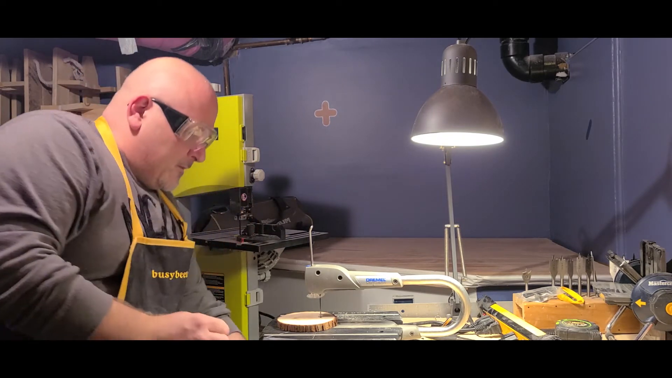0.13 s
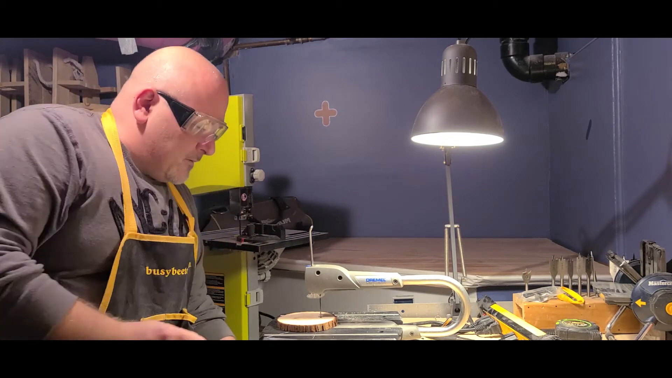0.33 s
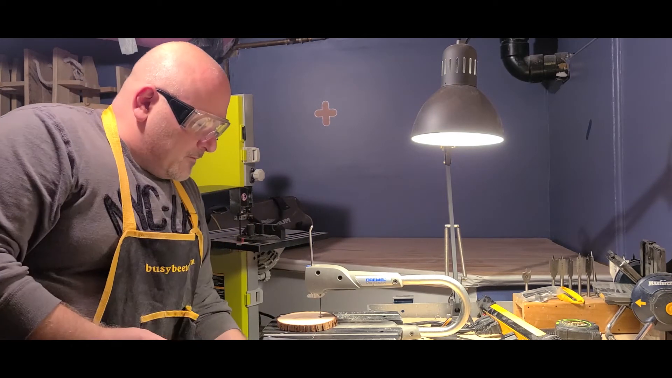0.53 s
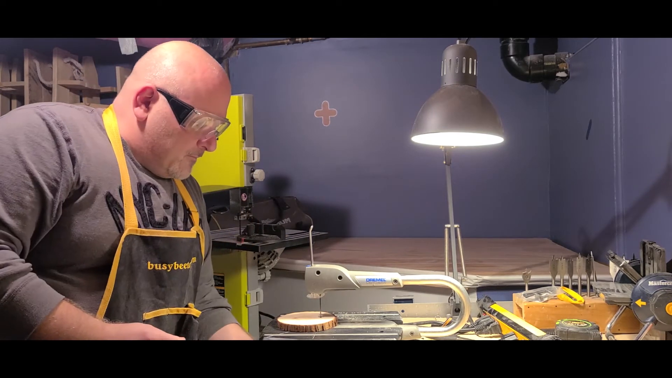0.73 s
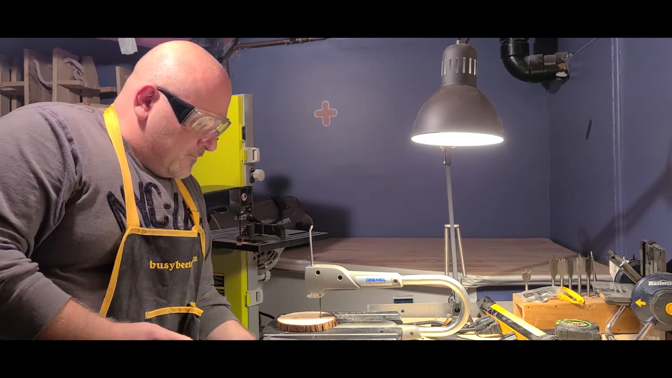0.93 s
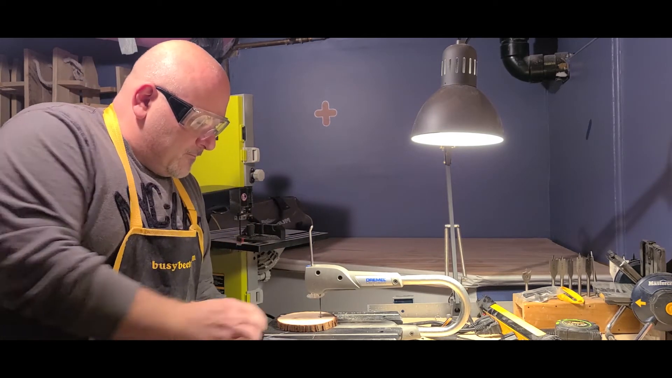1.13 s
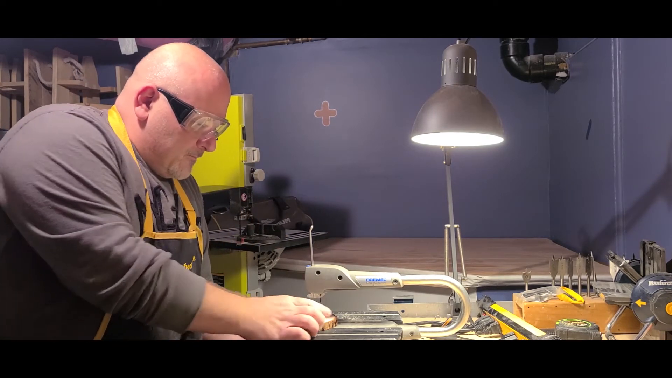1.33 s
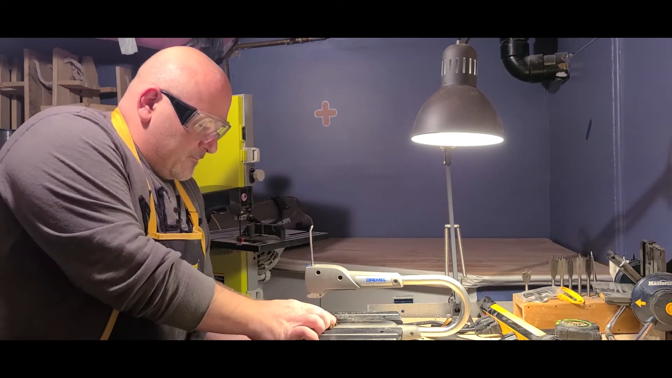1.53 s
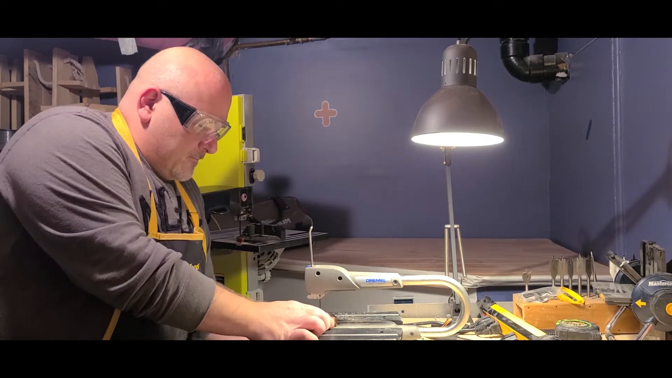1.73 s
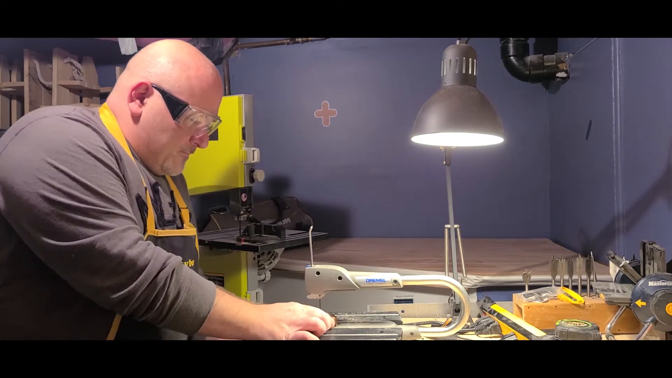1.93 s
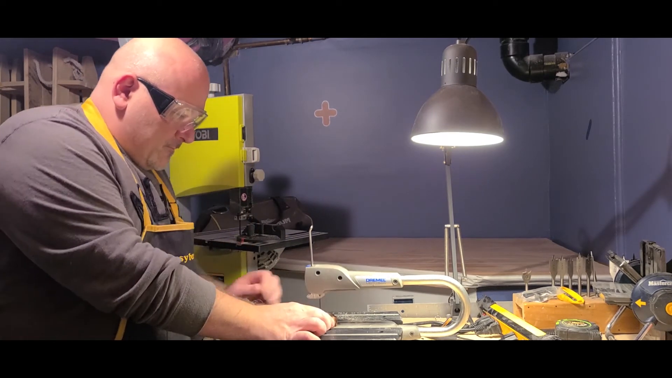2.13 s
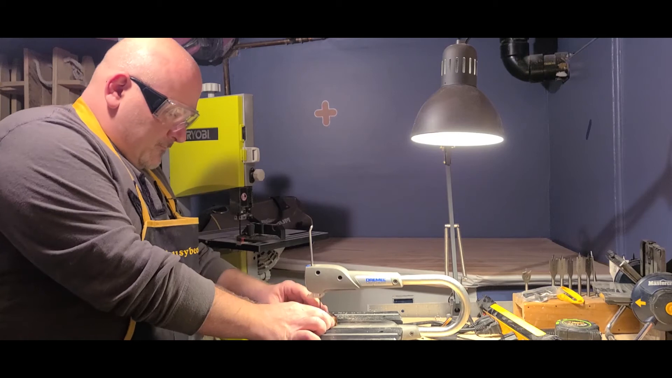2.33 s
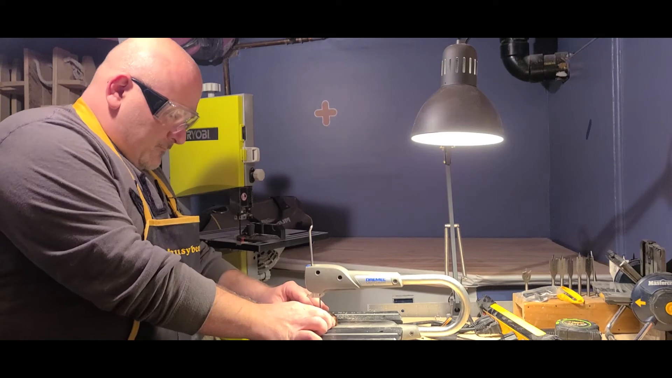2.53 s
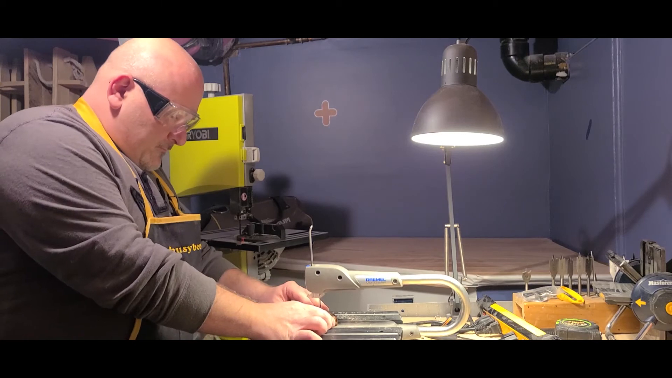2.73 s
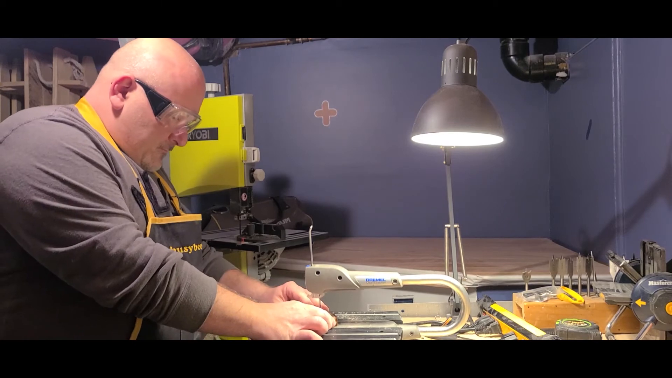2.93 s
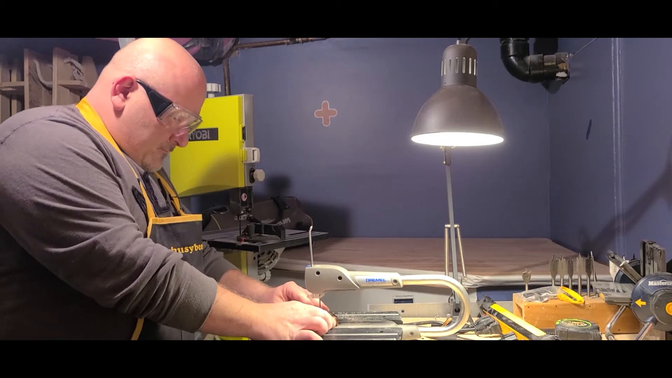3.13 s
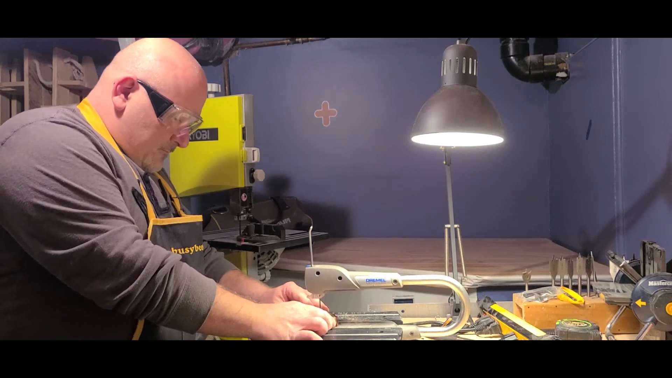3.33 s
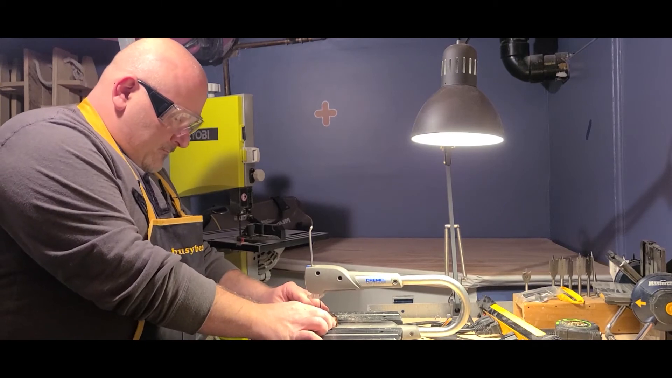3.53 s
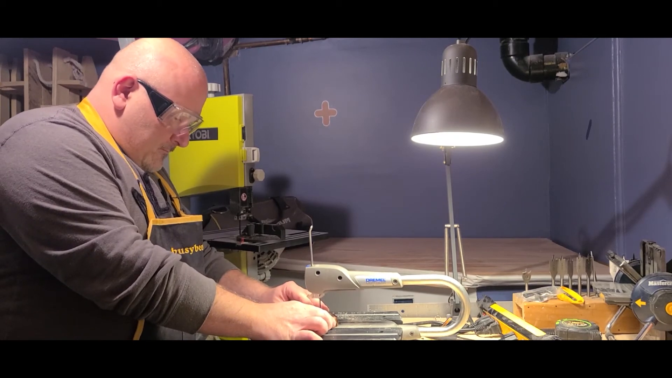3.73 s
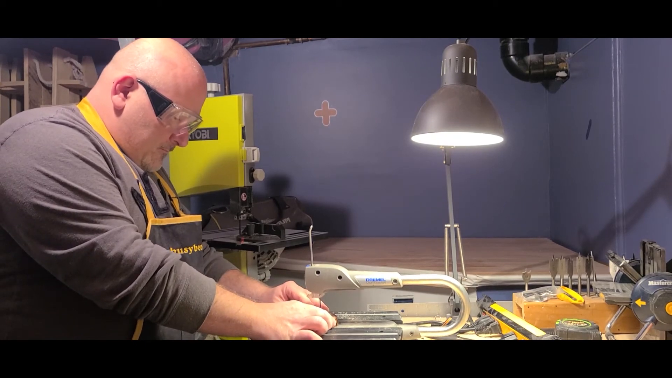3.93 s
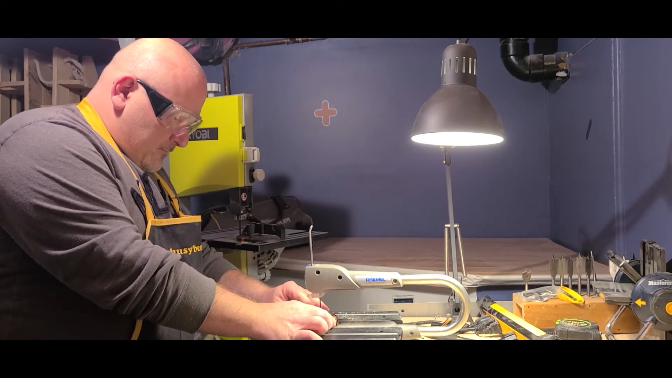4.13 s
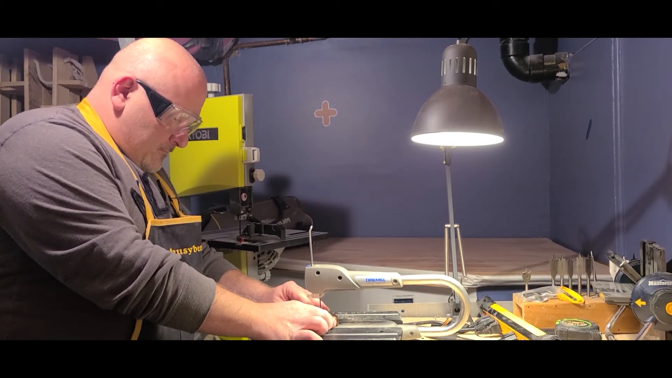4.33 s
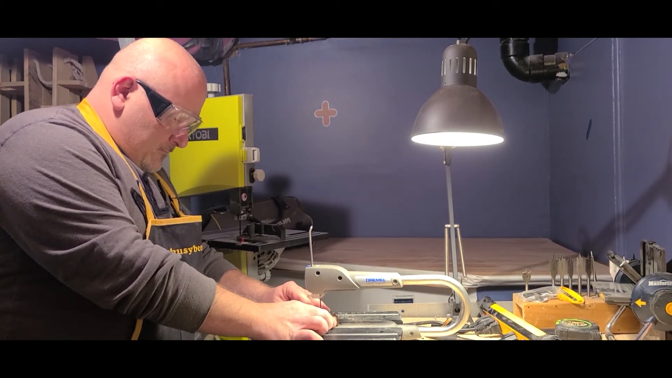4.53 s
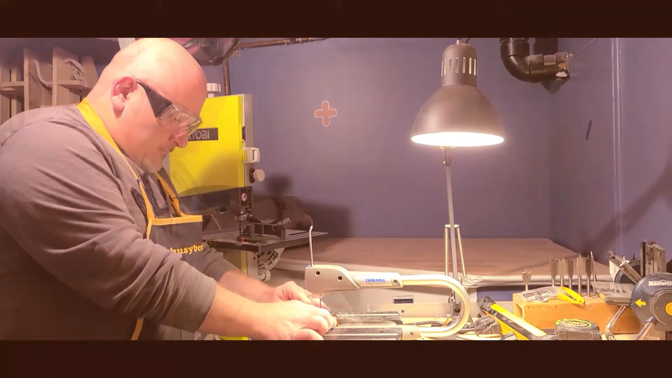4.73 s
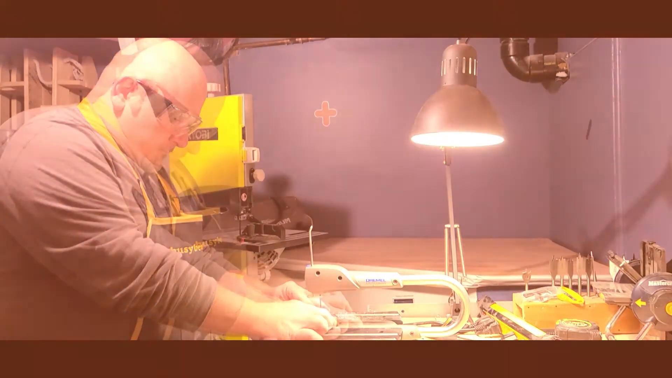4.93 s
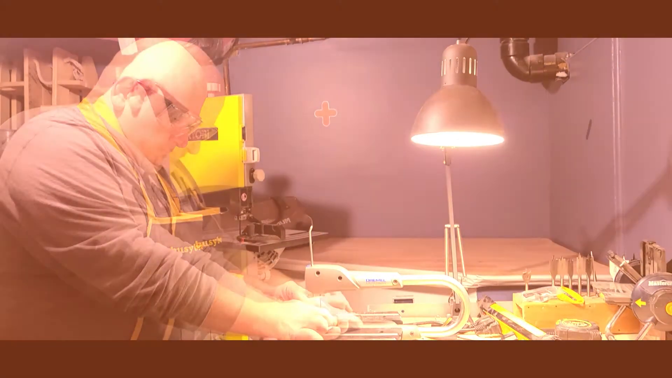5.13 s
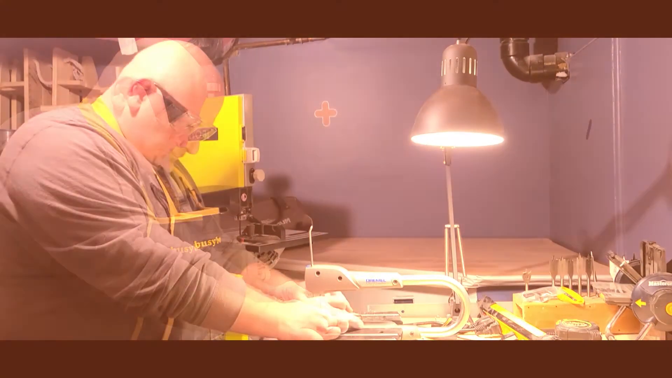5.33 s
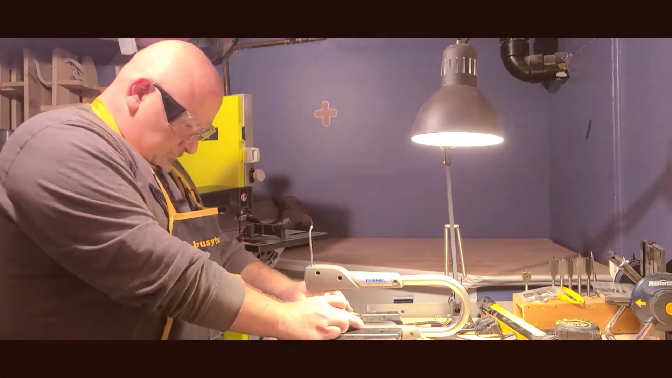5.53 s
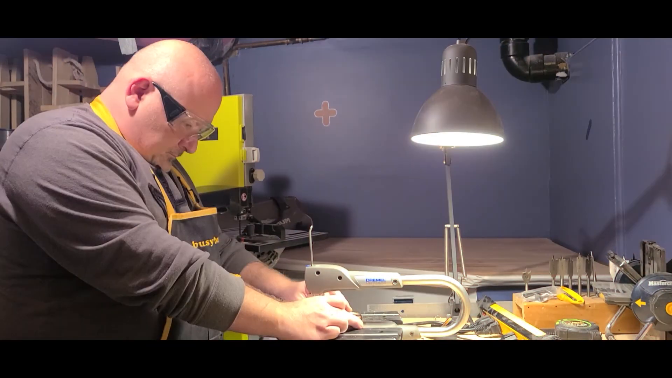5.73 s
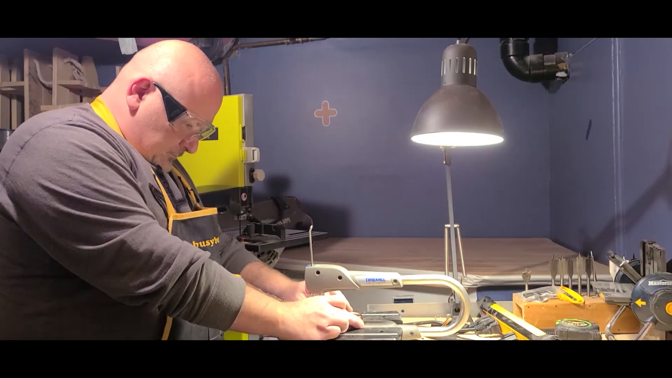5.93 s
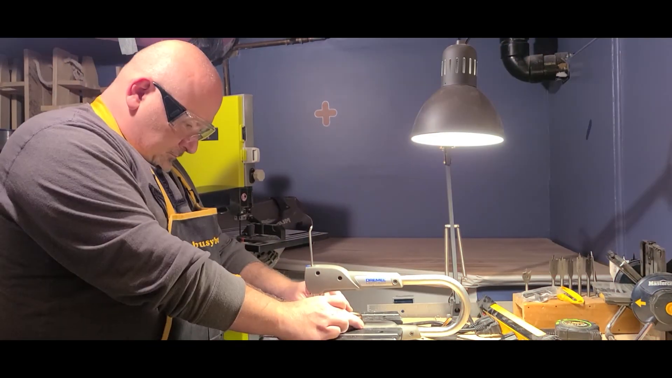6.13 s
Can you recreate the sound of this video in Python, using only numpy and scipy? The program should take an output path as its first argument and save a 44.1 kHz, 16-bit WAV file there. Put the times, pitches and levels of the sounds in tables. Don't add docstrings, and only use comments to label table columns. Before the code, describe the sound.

In a quiet workshop, low foot thuds, a shoe scuff, clothing rustle and tiny bench ticks come first. A bright plastic switch snaps and a scroll saw spins up almost instantly into a rattling hum with a high whine. Wood is pressed on, adding growing rasp and table knocks. After a tiny gap the saw continues steadier, with brief bursts of cutting. Close stereo microphone with automatic volume.

```python
import sys
import numpy as np
from scipy import signal
from scipy.fft import rfft, irfft, next_fast_len
from scipy.io import wavfile
from scipy.ndimage import map_coordinates

SR = 44100
rng = np.random.default_rng(int(sys.argv[2]) if len(sys.argv) > 2 else 0)


def unload_wav(signal):
    wavfile.write(
        sys.argv[1],
        SR,
        np.round(np.clip(np.atleast_2d(signal).T, -1, 1) * 32767).astype(np.int16),
    )


def boost(x):
    u = np.asarray(x, float) / 20
    return 10 ** u


N = 273420
TIME = np.arange(N) / SR

# pitch_hz, level_db
ROOM_COLOUR = [(15, -40), (55, 2), (250, -7), (1500, -20.5), (3500, -25), (5300, -28), (6500, -18),
               (8600, -41), (15500, -32)]
# pitch_hz, level_db
THUD_COLOUR = [(15, -29), (25, -13), (75, 6), (113, -21), (162, -2.5), (208, -40), (300, -30), (390, -49),
               (660, -120)]
# pitch_hz, level_db
SCUFF_COLOUR = [(410, -33), (700, 5), (893, -7), (1280, 2.5), (2370, -9), (4670, -17), (5040, -22),
                (7040, -23), (15000, -45)]
# pitch_hz, level_db
RUSTLE_COLOUR = [(120, -40), (200, -16), (248, 4.5), (280, -7), (406, -4.5), (500, -6), (1000, -20),
                 (1300, -55), (2200, -120)]
# peak_s, thud_db, scuff_db, rustle_db
MOVES = [(0.077, -43, -62, -50), (0.126, -36, -63, -51.5), (.2, -42.5, -59, -61), (.25, -48, -60.5, -58),
         (.298, -44, -70, -65), (.34, -55, -78, -72), (.44, -62, -85, -80), (.51, -57, -81, -71),
         (.558, -47, -84, -71), (.64, -56, -77, -59), (.71, -56, -85, -63), (.82, -59, -85, -61),
         (.854, -59, -77, -65), (1.016, -64, -95, -73), (1.306, -55, -92, -85), (1.42, -70, -90, -84),
         (1.54, -54, -72, -75)]
MOVE_RISE_DB_PER_S = 1100
MOVE_FALL_DB_PER_S = [
    250,
    172,
    112,
]
# start_s, level_db, pitch_hz, fade_60db_s
TAPS = [
    (0.0695, -53, 2940, 0.2),
    (.0745, -61, 2100, .05),
    (.194, -61, 4700, .03),
    (.632, -70, 2600, .04),
    (.847, -69, 2600, .04),
]

SWITCH_S = 1.5485
# silence_start_s, silence_end_s
CHANGE_S = (5.086, 5.108)
TEETH = 50
FREE_SPEED = 29.41
START_LACK, SPIN_UP_S = 24.4, 0.032
# time_s, load_strokes_per_s (speed lost), push_db
FEED = [(1.55, 0.039, -43.5), (3.0, 0.0099, -38.5), (3.5, 0.042, -36.5), (3.8, 0.11, -32),
        (4.2, .22, -29.5), (4.45, 0.37, -25.5), (4.6, 0.39, -25), (4.75, 0.41, -27.5), (5.085, 0.46, -28),
        (5.11, 0.0011, -39), (5.3, 0.063, -37), (5.42, 0.18, -28), (5.53, 0.195, -30.5),
        (5.65, 0.0096, -36.5), (5.77, 0.00098, -37.5), (5.87, .19, -30.5), (6.05, 0.3, -25.5),
        (6.2, 0.00098, -40.5)]

# stroke_multiple, level_db
HUM_EARLY = [(1, -18), (2, -11.5), (3, 4), (4, -3), (5, -5.5), (6, -16), (7, -26), (8, -28), (9, -30)]
# stroke_multiple, level_db
HUM_LATE = [(1, -27), (2, -29), (3, 2.5), (4, -7.5), (5, -8), (6, -4), (7, -16), (8, -8), (9, -21)]
WHINE_SIDES_DB = [-18, -16, -19, -11, -15, -7, -4, 0, -10, -11, -14, -18, -21]
OCTAVE_SIDES_DB = [-19, -14, -11, -10, -6, 0, -2, -5, -8, -10, -14, -18, -19]
PEAK_TURN, SMEAR = [0.277, 0.586], [0.019, 0.038]
# centre_stroke_multiple, level_db, spread_multiples
UPPER_CLUSTERS = [(100.2, -30, 6.5), (152.6, -32, 4.2), (200.8, -35, 3.6), (250, -42, 8), (301, -47, 3.7),
                  (349, -48.5, 3.8), (400.8, -45.5, 3), (485, -64, 4), (500, -51, 5.4)]
# time_s, width_s, rise_db
FLARES = [
    (1.72, 0.081, 8.5),
    (5.5, 0.11, 2),
]
# pitch_hz, level_db
CASING_COLOUR = [(120, -64), (250, -21.5), (500, -17.5), (820, -7), (1050, -18.5), (1300, -8),
                 (2200, -15.5), (3300, -11), (5200, -15), (8200, -23), (10000, -25), (13000, -27),
                 (15500, -39)]
# pitch_hz, width_hz, level_db
CASING_RINGS = [(740, 40, -8), (833, 16, 4.5), (1310, 11, 9.5), (1750, 60, -19)]

# pitch_hz, width_hz, level_db
TABLE_RINGS = [(218, 22, -9.5), (264, 26, -14), (391.5, 42, -6), (450.6, 22, -5), (574, 54, -7),
               (681, 44, -3), (809, 62, 1)]
# pitch_hz, width_hz, level_db
WOOD_RINGS = [(1050, 95, -3), (1268, 126, 3), (1728, 79, 1.5), (2160, 370, -10)]
# part_of_turn, level_db
BITES = [(0.51, -1.5), (.66, -10), (0.9, 3.5), (.22, 4.5), (0.051, -37)]
BITE_DB, BITE_GROWS, BITE_LATE_DB = -30.5, 1.3, 6
# stroke_multiple, level_db
DRUMMING = [(5, 0), (7, -1), (8, -3), (9, -2.5), (11, -2), (13, 1.5), (16, -0.5), (19, 0)]

RUNNING_DB, DUCK_DB, RECOVER_S = -26, -7.5, 0.87
LOUD_DUCK_DB = -7.5
HUM_DB, WHINE_OVER_DB, OCTAVE_OVER_DB, UPPER_OVER_DB = -4.5, -4, -3.5, 1.87
LATE_DB = [-3, -6.5, 0.5, -1.5, -2]
LOAD_DB = [4.24, 17.6, 7.1, 4.5, 2.4]
BUILD_S = [0.014, 0.17, 0.073, 0.034, 0.078]
DUCK_MORE_DB = [-0.5, -0.5, -3.5, -5, 0]
BUILD_DB = -23
WAVER_DB, WAVER_RATE = 1, 3.7
EVEN_LATE = 1.4
BUZZ_DB, BUZZ_DAMPED_S, BUZZ_FADE_S = -17.5, 3.0, 0.12

# pitch_hz, likeness_0_to_1
ALIKE = [(60, 0.95), (250, 0.95), (400, 0.28), (700, 0.45), (1400, 0.057), (6500, 0.026), (8500, .84),
         (10000, 1), (12000, 1), (14000, 0.35)]
# pitch_hz, difference_db
LEAN = [(60, -5), (400, 0.5), (900, -2.5), (2500, 6), (3500, -1.5), (6500, 9.5), (8500, 0.5), (10000, -4.5),
        (12000, -7), (14000, 1)]
TOP_HZ = 15950


def unit(x):
    return x / np.sqrt(np.mean(x ** 2) + 1e-20)


def along(points, hz):
    f, v = np.transpose(points)
    return np.interp(np.log(hz + 1), np.log(f + 1), v)


def curves(rows):
    s, *cols = np.transpose(rows)
    return [np.interp(TIME, s, c) for c in cols]


def wobble(rate):
    knots = rng.standard_normal(int(N * rate / SR) + 4)
    return map_coordinates(knots, [TIME * rate])


def filtered(x, response):
    m = next_fast_len(N + SR // 2)
    return irfft(rfft(x, m) * response(np.fft.rfftfreq(m, 1 / SR)), m)[..., :N]


def noise(colour):
    return unit(filtered(rng.standard_normal((2, N)), lambda hz: boost(along(colour, hz))))


def resonances(modes):
    def response(f):
        total = 0
        for k, (centre, width, db) in enumerate(modes):
            damping = 1j * f * width
            total = total + (-1) ** k * boost(db) * damping / (centre * centre - f * f + damping)
        return total
    return response


def per_stroke(gains, turns, rate, drift, scatter=1):
    size = 8192
    knots = int(N / SR * 6) + 2
    phase = scatter * rng.random((2, 1, len(gains))) + rng.random((2, 1, 1))
    steady = np.exp(2j * np.pi * phase)
    wander = rng.standard_normal((2, knots, len(gains), 2)) @ [1, 1j]
    waves = irfft(np.abs(gains) * drift * wander + gains * steady, size)
    where = [np.minimum(TIME * rate, knots - 1), turns % 1 * (size - 1)]
    return unit(np.array([map_coordinates(w, where, order=1) for w in waves]))


def moves():
    s, *layers = np.transpose(MOVES)
    since = TIME[:2 * SR] - s[:, None]
    shapes = []
    for db, fall in zip(layers, MOVE_FALL_DB_PER_S):
        slope_db = np.where(since < 0, MOVE_RISE_DB_PER_S * since, -fall * since)
        shapes.append(boost(db[:, None] + slope_db).max(axis=0))
    return np.pad(shapes, ((0, 0), (0, N - 2 * SR)))


def workshop():
    thud, scuff, rustle = moves()
    grit = boost(0.95 * wobble(150))
    steps = thud * noise(THUD_COLOUR)
    steps += boost(5.0) * scuff * grit * noise(SCUFF_COLOUR)
    steps += rustle * noise(RUSTLE_COLOUR)
    return steps * (TIME < SWITCH_S) + boost(-69.5) * noise(ROOM_COLOUR)


def taps():
    out = np.zeros((2, N))
    for s, db, hz, t60 in TAPS:
        ring = noise([(hz * 0.3, -30), (hz * 0.85, -12), (hz, 0), (hz * 1.15, -12), (15000, -28)])
        out += (TIME > s) * boost(db - 60 * np.maximum(TIME - s, 0) / t60) * ring
    return out


def bench_rumble():
    rumble = noise([(15, -2), (35, 7), (100, 6.5), (250, -2.5), (500, -63)])
    return (TIME > SWITCH_S) * boost(-43.5 + 2.3 * wobble(8)) * rumble


def switch():
    t = np.maximum(TIME - SWITCH_S, 0)
    snap = boost(-23.5 - 60 * t / 0.0074)
    echo = boost(-28 - 60 * t / 0.12)
    colour = [(300, -50), (2500, 0.5), (8000, 5), (11000, -6), (16000, 1)]
    return (TIME > SWITCH_S) * (snap + echo) * noise(colour)


def run_up(turns):
    sweep = np.sin(2 * np.pi * TEETH * turns) * (TIME < 1.64)
    return boost(-23.0) * filtered(sweep, resonances(CASING_RINGS)) * [[1], [0.7]]


def frame(turns):
    early, late = (np.r_[0, boost(np.transpose(table)[1])] for table in (HUM_EARLY, HUM_LATE))
    before = per_stroke(early, turns, rate=1.5, drift=0.1)
    after = per_stroke(late, turns, rate=3, drift=0.12)
    return np.where(TIME < CHANGE_S[1], before, after)


def buzz(turns):
    free = 1 / (1 + np.exp((TIME - BUZZ_DAMPED_S) / BUZZ_FADE_S))
    return free * per_stroke(np.r_[np.zeros(8), 1], turns, rate=3, drift=0.15)


def whirr(turns):
    rattle = per_stroke(np.r_[np.zeros(8), np.ones(530)], turns, rate=2.5, drift=0.55)
    swell = boost(1.5 * np.cos(4 * np.pi * turns + 1.2) + 1.1 * wobble(60) + 0.4 * wobble(12))
    hiss = 0.98 * swell * rng.standard_normal((2, N))
    body = filtered(rattle, lambda hz: 0.43 / (1 + (hz / 3500) ** 2)) + hiss
    return unit(filtered(body, lambda hz: boost(along(CASING_COLOUR, hz))))


def tooth_tone(multiple, side_db, turns):
    count = len(side_db)
    gains = np.zeros(TEETH * multiple + 7, complex)
    k = np.arange(count) - count // 2
    swell = PEAK_TURN[multiple - 1] * k + SMEAR[multiple - 1] * k * k
    gains[-count:] = boost(np.array(side_db)) * np.exp(-2j * np.pi * swell)
    return per_stroke(gains, turns, rate=1.8, drift=0.39, scatter=0.29)


def even_whine(turns):
    sides = boost(EVEN_LATE * np.array(WHINE_SIDES_DB[:8]))
    return per_stroke(np.r_[np.zeros(TEETH - 6), sides], turns, rate=4, drift=0.2)


def upper_whine(turns):
    order = np.arange(TEETH * 11)
    gains = 0
    for centre, db, wide in UPPER_CLUSTERS:
        gains = gains + boost(db) / (1 + ((order - centre) / wide) ** 2) / np.sqrt(wide)
    return per_stroke(gains, turns, rate=3, drift=0.77)


def pressed(turns):
    gains = np.zeros(20)
    for multiple, db in DRUMMING:
        gains[round(multiple)] = boost(db)
    return per_stroke(gains, turns, rate=2.515, drift=0.13)


def cutting(turns):
    push_db = curves(FEED)[1]
    bite_db = BITE_DB + BITE_GROWS * (push_db + 27.5) + BITE_LATE_DB * (TIME > CHANGE_S[0])
    downstroke = boost(5.9 * np.cos(2 * np.pi * (turns - 0.6)))
    grain = per_stroke(np.r_[np.zeros(5), np.ones(110)], turns, rate=3, drift=0.35)
    blows = downstroke * (0.024 * grain + 0.018 * rng.standard_normal((2, N)))
    strokes = np.arange(int(turns[-1]))
    for part, db in BITES:
        for side in blows:
            luck = rng.standard_normal((len(strokes), 2))
            when = strokes + part + 0.0098 * luck[:, 0] + 0.0392 * rng.random()
            at = np.interp(when, turns, np.arange(N))
            side += np.bincount(at.astype(int), boost(db + 3.0 * luck[:, 1]), N)
    table = unit(filtered(blows, resonances(TABLE_RINGS))) + 0.52 * pressed(turns)
    wood = unit(filtered(blows, resonances(WOOD_RINGS)))
    return boost(push_db) * table + boost(bite_db) * wood


def levels(load):
    t = np.maximum(TIME - SWITCH_S, 0)
    ducked = np.exp(-t / RECOVER_S)
    flare_db = sum(db * np.exp(-((TIME - s) / wide) ** 2) for s, wide, db in FLARES)
    whine_db = WHINE_OVER_DB + WAVER_DB * wobble(WAVER_RATE)
    octave_db = OCTAVE_OVER_DB + flare_db + WAVER_DB * wobble(WAVER_RATE)
    over_db = [0, HUM_DB, whine_db, octave_db, UPPER_OVER_DB]
    late = TIME > CHANGE_S[0]
    result = []
    for over, more, build, jump, grows in zip(over_db, DUCK_MORE_DB, BUILD_S, LATE_DB, LOAD_DB):
        start_db = (DUCK_DB + more) * ducked + BUILD_DB * np.exp(-(t / build) ** 2)
        load_db = np.where(late, jump + grows * load, (grows + LOUD_DUCK_DB) * load)
        result.append(RUNNING_DB + over + start_db + load_db)
    return result


def saw():
    load = curves(FEED)[0]
    speed = FREE_SPEED - load - START_LACK * np.exp(-np.maximum(TIME - SWITCH_S, 0) / SPIN_UP_S)
    turns = np.cumsum(speed * (TIME > SWITCH_S)) / SR
    turns = turns + 0.5 * (TIME > CHANGE_S[1] - 0.01)
    flutter = turns + 0.00057 * wobble(25)
    ripple = 0.00025 * np.sin(2 * np.pi * turns)
    whirr_db, hum_db, whine_db, octave_db, upper_db = levels(load)
    whine = np.where(TIME < CHANGE_S[0], tooth_tone(1, WHINE_SIDES_DB, flutter), even_whine(flutter))
    sound = boost(hum_db + 1.5) * frame(turns)
    sound += boost(hum_db - HUM_DB + BUZZ_DB) * buzz(turns)
    sound += boost(whirr_db + 2) * whirr(turns)
    sound += boost(whine_db + 3.0) * whine
    sound += boost(octave_db + 2.5) * tooth_tone(2, OCTAVE_SIDES_DB, flutter)
    sound += boost(upper_db) * upper_whine(flutter + ripple)
    sound += cutting(turns) + run_up(turns)
    return sound * np.clip((TIME - SWITCH_S) / 0.013, 0, 1)


def scene():
    pair = workshop() + taps() + bench_rumble() + switch() + saw()

    def mid_side(hz):
        angle = np.arccos(np.clip(along(ALIKE, hz), -1, 1)) / 2
        return [np.cos(angle), np.sin(angle)]

    mid, side = filtered(pair, mid_side)
    stereo = np.array([mid + side, mid - side])
    return filtered(stereo, lambda hz: boost(np.outer([0.5, -0.5], along(LEAN, hz))))


def low_pass(x):
    return signal.sosfilt(signal.butter(12, 16690, fs=SR, output="sos"), x)


def record(dry):
    kept = np.clip(np.maximum(CHANGE_S[0] - TIME, TIME - CHANGE_S[1]) / 0.0002, 0, 1)
    mix = filtered(dry, lambda hz: hz < TOP_HZ) * kept
    return low_pass(mix)


dry = scene()
out = record(dry)
unload_wav(out)
```